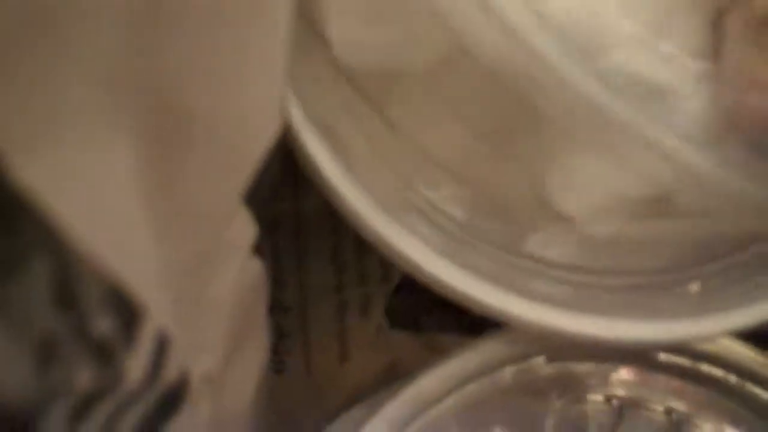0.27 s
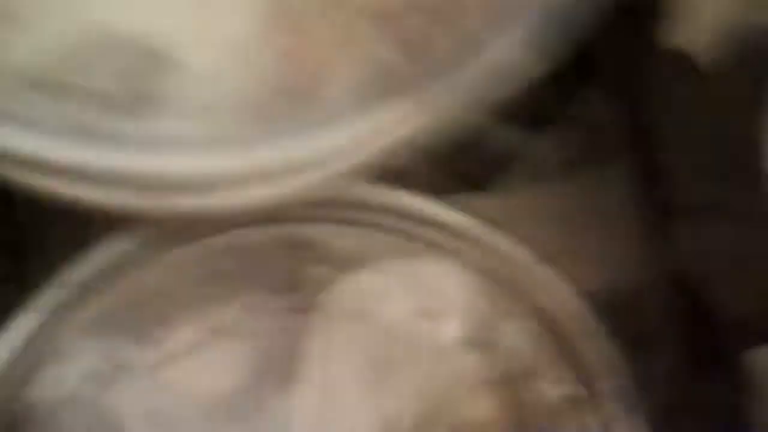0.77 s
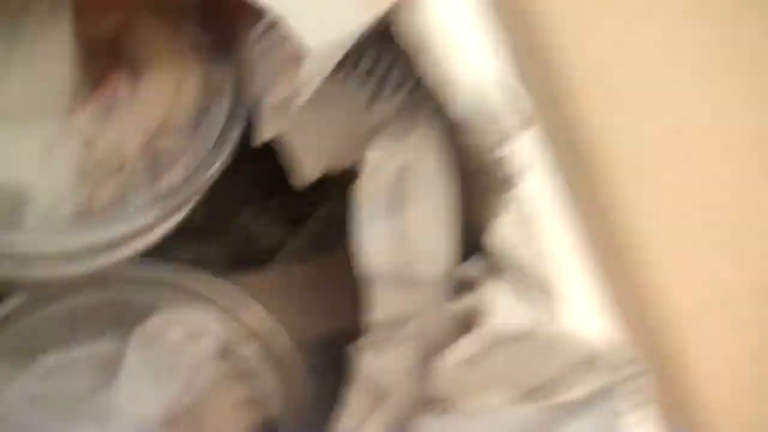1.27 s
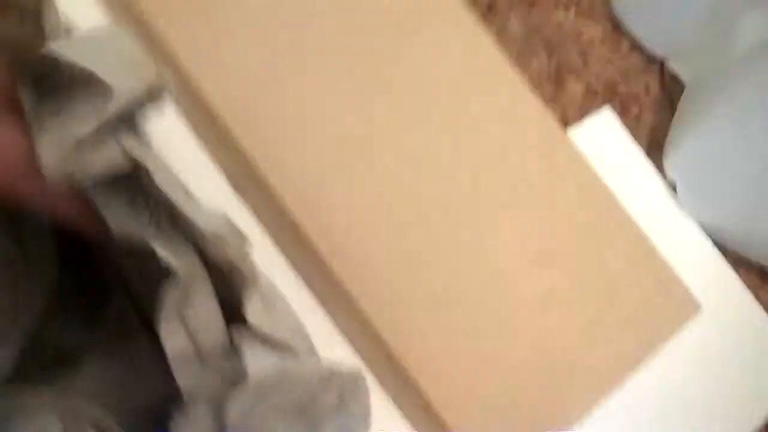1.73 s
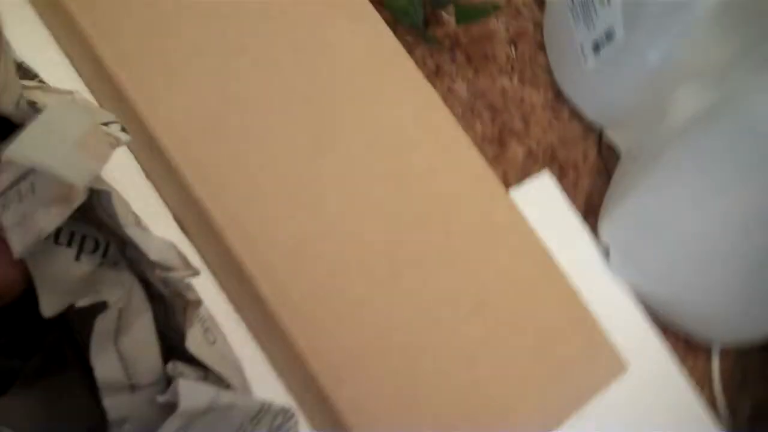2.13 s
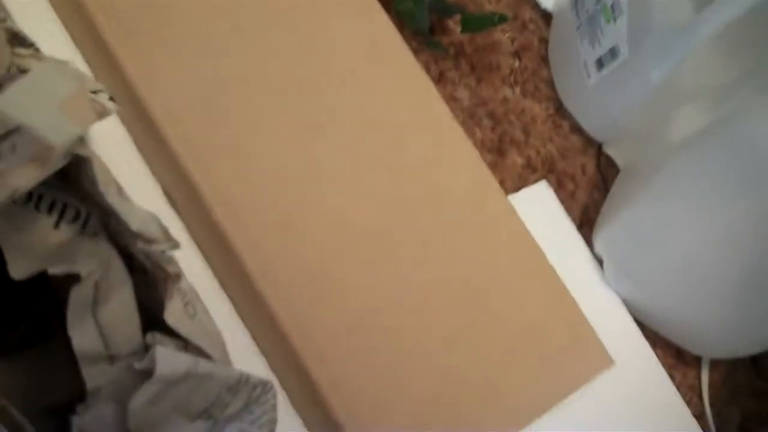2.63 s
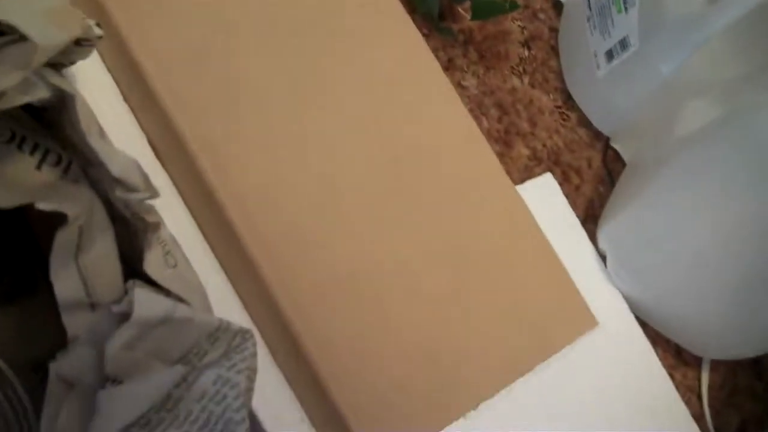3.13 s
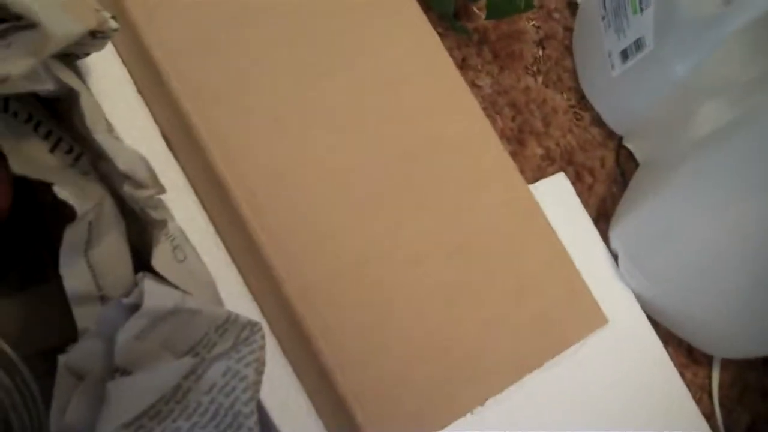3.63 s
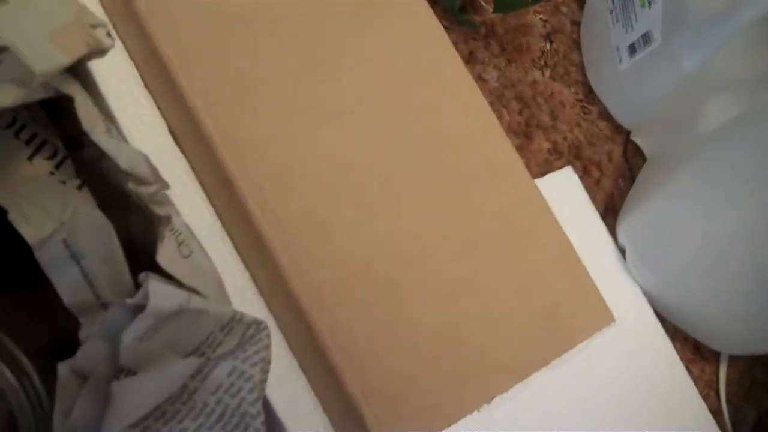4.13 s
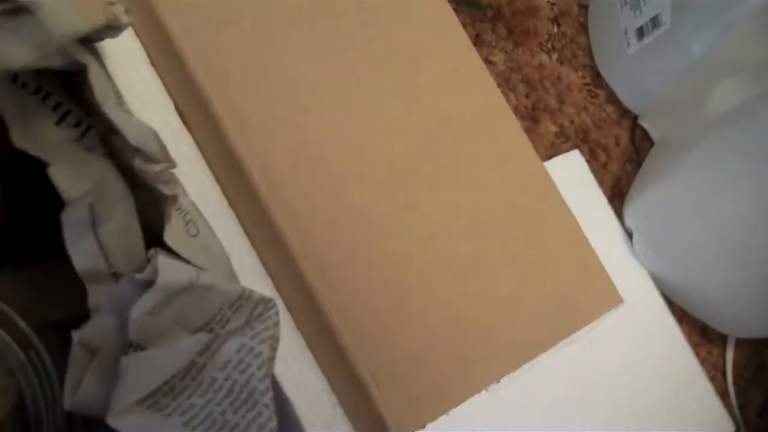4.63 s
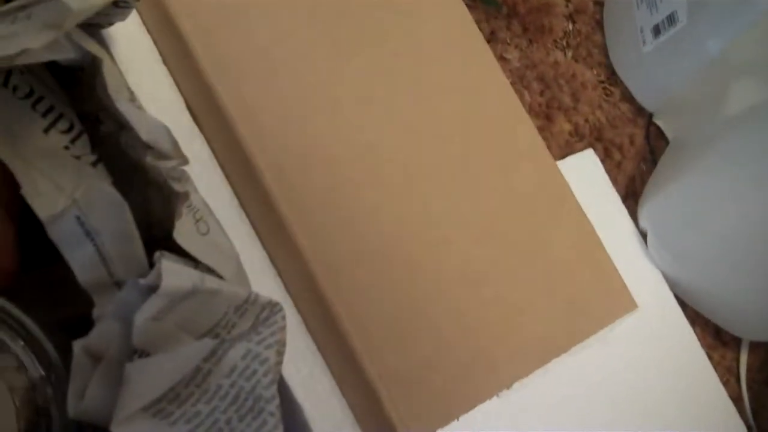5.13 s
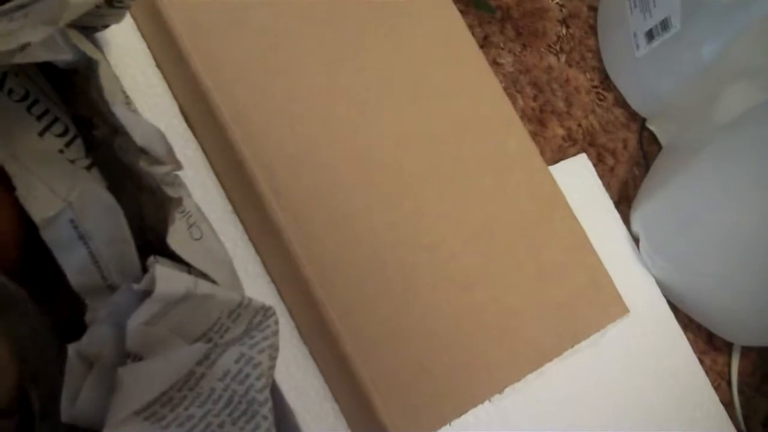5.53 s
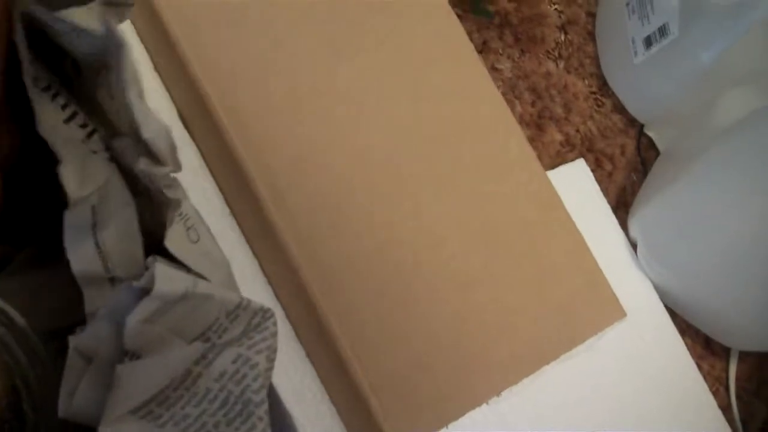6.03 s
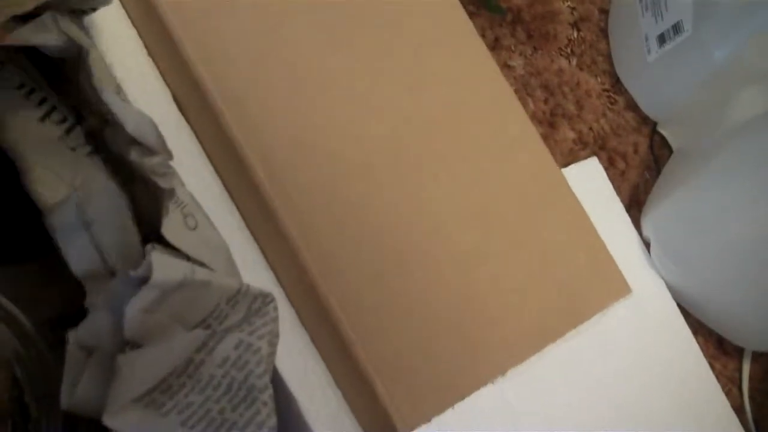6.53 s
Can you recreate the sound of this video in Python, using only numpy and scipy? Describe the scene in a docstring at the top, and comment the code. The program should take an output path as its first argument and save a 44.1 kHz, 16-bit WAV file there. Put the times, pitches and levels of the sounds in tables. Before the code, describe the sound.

Hands push crumpled paper about in a cardboard box. It opens loud, with hissing sheets, hard creasing snaps, a plastic clack, hollow rubbing and low rumble from a dragged tub. The paper softens around three seconds, picks up again with light clicks and a clack, and ends in quick, crunchy strokes. Close stereo microphones, treble-heavy, in a small furnished room.

```python
"""Paper hisses, crinkles and snaps as plastic tubs and crumpled newspaper are pushed about in a cardboard box.
Sliding sheets are filtered noise and tiny crackles; creases snap as short noise bursts, singly or in runs.
Box and tubs give dull bumps, rubs and rumbles from damped noise; clacks and a creak are sums of sines.
Everything is heard close up in a small room, through two microphone ports that ring in the treble;
gain control then pulls the level down after loud sounds, and peaks beyond full scale are clipped."""
import sys
import numpy as np
from scipy import signal
from scipy.fft import rfft, irfft
from scipy.io import wavfile
from scipy.ndimage import uniform_filter1d

SR = 44100
rng = np.random.default_rng(int(sys.argv[2]) if len(sys.argv) > 2 else 0)


def master_out(mix):
    """Clip the mix to full scale and print it as 16-bit PCM to the path in sys.argv[1]."""
    frames = np.transpose(np.atleast_2d(mix))
    ceiling = np.clip(frames, -1, 1)
    pcm = np.round(ceiling * 32767).astype(np.int16)
    wavfile.write(sys.argv[1], SR, pcm)


N = 299659
TIME = np.arange(N) / SR  # seconds

# Spectrum of a cracking crease, for single snaps and runs. Each row: frequency in Hz, level in dB per Hz.
CRACK_SPECTRUM = [(30, -27), (150, -19.5), (500, 1), (1100, -7.5), (1900, 1), (4000, -0.5), (7000, -2),
                  (14000, -0.5)]


def amp(db):
    """Turns decibels into a gain."""
    return 10 ** (np.asarray(db) / 20)


def unit(x):
    """Scales a sound to rms 1."""
    return x / np.sqrt(np.mean(x ** 2) + 1e-20)


def read(points, hz):
    """Reads a table of values between its points, on a log-frequency axis."""
    f, value = np.transpose(points)
    return np.interp(np.log(hz + 1), np.log(f), value)


def add(mix, s, sound):
    """Lays a sound into the mix at s seconds."""
    start = max(round(s * SR), 0)
    part = mix[..., start:][..., :sound.shape[-1]]
    part += sound[..., :part.shape[-1]]


def colour(x, points, size=2048):
    """Filters with the given spectrum, never ahead of time, so that clicks keep their sharp front."""
    hz = abs(np.fft.fftfreq(size, 1 / SR))
    log_gain = np.log(amp(read(points, hz)))
    # minimum phase: the filter answers as early as it can
    response = np.exp(np.conj(signal.hilbert(log_gain)))
    taps = np.fft.ifft(response).real[:size // 2]
    return signal.oaconvolve(x, taps[None], axes=1)[:, :x.shape[1]]


def resonate(x, hz, width_hz):
    """Rings at one pitch; a wider resonance is more damped and dies sooner."""
    pole = np.exp((2j * np.pi * hz - np.pi * abs(width_hz)) / SR)
    return signal.lfilter([1 - abs(pole)], [1, -pole], x).real


def dying(t, t60):
    """Dies away exponentially, by 60 dB in t60 seconds."""
    return np.exp(-np.log(1000) * t / np.maximum(t60, 1e-4))


def wander(rate):
    """Drifts smoothly by chance, about rate times a second, with rms 1."""
    hz = np.fft.rfftfreq(N, 1 / SR)
    slow = rfft(rng.standard_normal(N)) * np.exp(-(hz / rate) ** 2)
    return unit(irfft(slow, N))


def noise(size):
    """White noise, one row for each port."""
    return rng.standard_normal((2, size))


def room_tone():
    """The quiet room's steady background: coloured noise."""
    # Each row: frequency in Hz, level in dB per Hz.
    tone_spectrum = [(25, 19), (130, 5), (300, -7), (1000, -1), (14000, -3)]
    return unit(colour(noise(N), tone_spectrum))


def room(x, size=256):
    """A small furnished room answers with a short noise tail that dies at its own pace in each pitch range."""
    # How long the tail lasts. Each row: frequency in Hz, t60 in seconds.
    tail_times = [(150, 0.16), (3000, 0.3), (14000, 0.22)]
    hz, t, z = signal.stft(noise(SR // 2), SR, nperseg=size)
    fading = z * dying(t, read(tail_times, hz)[:, None])
    tail = signal.istft(fading, SR, nperseg=size)[1]
    tail *= np.minimum(TIME[:tail.shape[1]] / 0.0071, 1)  # builds up over 7.1 ms
    return signal.fftconvolve(x, tail / np.linalg.norm(tail[0]), axes=1)[:, :N]


def stroke(s, length, attack_s=0.014, sag_db=-1.5, release_t60=0.18):
    """One hand movement takes hold in a smooth swell, eases as the paper yields, then lets go."""
    age = TIME - s
    swell = (1 + np.tanh(age / attack_s - 0.5)) / 2
    hold = amp(sag_db * np.clip(age / length, 0, 1))
    return swell * hold * dying(np.clip(age - length, 0, 1), release_t60)


def handling(settle_db=-51.5, rub_db=-24, rub_per_db=0.5):
    """Gains of sliding, squeezing, pressing and dragging; the strongest movement of the moment leads."""
    # The hand pushes the paper. Each row: start in seconds, length in seconds, hiss of the sliding
    # sheets in dB, scrunch of the wad against that hiss in dB (both before the trims in rustle).
    pushes = [(0, 0.093, -31, -3.5), (0.16, 0.077, -29, -1.5), (0.285, 0.083, -34.5, -4),
              (0.391, 0.064, -31, 2), (0.616, .075, -34.5, -5.5), (0.707, 0.085, -33, -1),
              (0.75, 0.19, -30.5, -1), (0.913, 0.081, -27, 0), (0.99, 0.078, -30, -2.5),
              (1.095, 0.21, -36, -5.5), (1.257, 0.31, -33.5, -2), (1.587, 0.22, -38, -2.5),
              (1.724, 0.038, -28.5, 0), (1.795, .19, -35.5, -4.5), (1.994, 0.31, -34, -3),
              (2.324, 0.071, -35, -4), (2.428, 0.095, -37, -0.5), (2.665, 0.06, -38.5, -0.5),
              (2.767, 0.072, -37.5, 0.5), (2.943, 0.21, -42.5, -0.5), (3.219, .05, -37, -5),
              (3.26, 0.19, -28, -7.5), (3.454, 0.1, -31.5, -3), (3.574, 0.12, -43.5, -1.5),
              (3.773, 0.24, -43, -2), (3.904, 0.15, -42, -4), (4.092, 0.056, -33, 2),
              (4.138, 0.23, -37, -2), (4.387, 0.15, -40, -1.5), (4.567, 0.11, -39.5, -2.5),
              (4.661, 0.088, -36.5, -4.5), (4.747, 0.097, -41, -2.5), (4.865, 0.21, -32, -1.5),
              (5.178, 0.032, -36, 0), (5.23, 0.055, -42.5, -2), (5.285, 0.26, -38.5, 1.5),
              (5.38, .08, -35, 0.5), (5.499, 0.089, -31, 0), (5.595, .11, -40, 0), (5.733, 0.16, -40, -1.5),
              (5.913, 0.18, -41.5, -4.5), (5.986, .1, -35, -2.5), (6.11, 0.05, -26, -1.5),
              (6.194, 0.041, -27, -5), (6.268, 0.1, -27, -3), (6.393, .04, -38, -2),
              (6.473, 0.033, -30.5, -4), (6.538, 0.027, -32, -1.5), (6.598, 0.17, -37, -4.5)]
    # A tub is dragged along the box. Each row: start in seconds, length in seconds,
    # level in dB before the trims in rustle and rumble.
    drags = [(0.175, .11, -34), (0.334, 0.22, -36), (.55, .15, -40), (.72, 0.25, -39.5)]
    # the wad keeps settling between pushes
    slide = squeeze = np.full(N, amp(settle_db))
    for s, length, db, scrunch_db in pushes:
        push = amp(db) * stroke(s, length)
        slide = np.maximum(slide, push)
        squeeze = np.maximum(squeeze, amp(scrunch_db) * push)
    drag = np.max([amp(db) * stroke(s, length) for s, length, db in drags], axis=0)
    # a harder squeeze presses on the box more, but by fewer dB than it scrunches
    press = np.maximum(amp(rub_db) * squeeze ** rub_per_db, drag)
    return slide, squeeze, press, drag


def rumble(drag, level_db=-6, judder_db=3):
    """The box floor judders under a dragged tub: low noise of unsteady strength."""
    # Each row: frequency in Hz, level in dB per Hz.
    floor_spectrum = [(25, -11), (70, -15), (130, 5), (200, -9.5), (400, -33), (2000, -60)]
    judder = amp(level_db + judder_db * wander(25))
    return judder * drag * unit(colour(noise(N), floor_spectrum))


def bumps(width_share=0.2, level_db=-7):
    """Soft blows on heavily damped card and plastic panels: short bursts of resonant noise."""
    # Each row: start in seconds, level in dB before level_db, pitch in Hz, t60 of its fading in seconds.
    blows = [(0.2, -17, 154, 0.1), (0.203, -6.5, 950, 0.07), (.382, -16.5, 790, 0.067),
             (0.521, -11.5, 170, 0.041), (0.788, -12, 820, 0.023), (0.788, -26, 75, 0.057),
             (.882, -14, 760, 0.055), (1.147, -15, 990, 0.11), (1.656, -29, 90, 0.034),
             (1.674, -19, 666, 0.05), (3.399, -25, 285, 0.079), (3.922, -17, 377, 0.073),
             (3.923, -30, 80, .06), (4.973, -29, 90, 0.038), (5.576, -20, 360, 0.049),
             (5.688, -21.5, 403, 0.056), (6.145, -19, 357, 0.14), (6.151, -25, 141, 0.088),
             (6.361, -20.5, 315, 0.12), (6.364, -27, 70, 0.061)]
    t, out = np.arange(SR // 6) / SR, np.zeros((2, N))
    for s, db, hz, t60 in blows:
        shape = dying(t, t60) * (1 - np.exp(-t / 0.00018))
        panel = unit(resonate(noise(len(t)), hz, hz * width_share) * shape)
        panel *= np.sqrt(np.mean(shape ** 2))
        add(out, s, amp(db + level_db) * panel)
    return out


def tubs(octave_db=3):
    """A stiff tub's wall rings when knocked, and a tub creaks low and briefly as it slides free."""
    # A tub clacks. Each row: start in seconds, level in dB.
    clacks = [(0.1994, -14), (3.9221, -11.5)]
    # Ringing tones of its wall. Each row: frequency in Hz, level within the clack in dB, t60 in seconds.
    wall_tones = [(747, -11.5, 0.093), (1910, -27, 0.015), (1940, 2, 0.031), (2416, -11, 0.025),
                  (3460, -5.5, 0.011), (3860, -10.5, 0.029)]
    # Course of the creak. Each row: time in seconds, slips per second, level in dB.
    creak = [(0.545, 210, -43), (.572, 230, -40), (.600, 227, -39), (.618, 273, -34), (.630, 350, -64)]
    t, out = np.arange(SR // 10) / SR, np.zeros(N)
    wall = sum(amp(db) * dying(t, t60) * np.sin(2 * np.pi * hz * t) for hz, db, t60 in wall_tones)
    for s, db in clacks:
        add(out, s, amp(db) * wall)

    s, rate, db = np.transpose(creak)
    t = np.arange(s[0], s[-1], 1 / SR)
    turn = 2 * np.pi * np.cumsum(np.interp(t, s, rate)) / SR
    slips = unit(np.sin(turn) + amp(octave_db) * np.sin(2 * turn))
    add(out, s[0], amp(np.interp(t, s, db)) * slips)
    return out


def crinkles(per_s, spread_db, count=64):
    """Countless tiny buckles of unequal size, each briefly ringing one of many paper facets."""
    t, out = np.arange(SR // 120) / SR, np.zeros((2, N))
    for hz in np.geomspace(800, 12000, count):
        at = np.flatnonzero(rng.random(N) < per_s / count / SR)
        crack = noise(len(t)) * dying(t, 0.0066)
        grain = unit(resonate(crack, hz, hz / 4)) + unit(crack)
        sizes = amp(spread_db * np.minimum(rng.exponential(1, N)[at], 3.3))
        for start, size in zip(at, sizes):
            add(out, start / SR, size * grain)
    return unit(out)


def folds(x, depth_db, size=512):
    """Pockets in the wad open and close, so its resonances come and go."""
    z = signal.stft(x, SR, nperseg=size)[2]
    pockets = rng.standard_normal(z.shape[1:])
    pockets = uniform_filter1d(pockets, size=4, axis=0)  # neighbouring pitches
    pockets = uniform_filter1d(pockets, size=5, axis=1)  # neighbouring moments
    gain = amp(depth_db * np.clip(unit(pockets), -2, 2))
    return signal.istft(z * gain, SR, nperseg=size)[1][:, :N]


def rustle(gains, hiss_db=2, scrunch_db=-1, rub_db=-1, smooth_db=-3, scrape_hz=1050, scrape_width_hz=1100,
           scrape_db=-1, tub_grain=0.74, catch_db=2.0, tub_down_s=1.477):
    """Things slide in fits and starts: friction hiss, the scrunch of the wad, and a hollow rub on the box."""
    # Spectra of sliding sheets, squeezed wad and rubbed box.
    # Each row: frequency in Hz, level in dB per Hz.
    hiss_spectrum = [(200, -86), (1200, -27.5), (2500, -0.5), (3500, 7.5), (4500, 4.5), (6500, 0.5),
                     (9000, 0), (14000, 4.5)]
    scrunch_spectrum = [(150, -16), (550, 1.5), (900, -1), (1250, 2), (1800, 8), (2800, 5), (4000, -1),
                        (9000, -15)]
    rub_spectrum = [(25, -31), (80, -13.5), (140, 0), (210, -6), (310, 5), (550, -3.5), (850, -1.5),
                    (1500, -39), (4000, -27)]
    catching = amp(catch_db * wander(50))
    slide, squeeze, press = (gain * catching for gain in gains)
    # the hand drags a tub at first, fading out by tub_down_s; afterwards it works the paper alone
    dragging = np.clip((tub_down_s - TIME) * 10, 0, 1)
    # a smooth tub buckles fewer creases than fingers do, so the grains are softer
    grains = crinkles(per_s=1400, spread_db=2.5) * (1 + (tub_grain - 1) * dragging)
    friction = grains + amp(smooth_db) * noise(N)
    sheets = unit(colour(folds(friction, depth_db=2.1), hiss_spectrum))
    wad = unit(colour(folds(friction, depth_db=3.0), scrunch_spectrum))
    # the tub's hollow body pulls the scrunch down in pitch
    scrape = resonate(noise(N), scrape_hz, scrape_width_hz)
    scrape = unit(resonate(scrape, scrape_hz, 2 * scrape_width_hz))
    wad = wad * (1 - dragging / 2) + amp(scrape_db) * dragging * scrape
    box = unit(colour(noise(N), rub_spectrum))
    return amp(hiss_db) * slide * sheets + amp(scrunch_db) * squeeze * wad + amp(rub_db) * press * box


def crunches(jolt_db=4.0):
    """One crease trips the next: a ragged noise burst that swells fast and runs out."""
    # Runs of creases giving way together. Each row: start in seconds, length in seconds,
    # level in dB before the swell's shape.
    runs = [(0.2, 0.009, -12), (0.428, 0.026, -21), (.499, 0.0084, -9.5), (0.517, 0.011, -7.5),
            (3.387, 0.03, -23.5), (4.673, 0.024, -28), (5.051, 0.0099, -29.5), (6.137, 0.019, -17),
            (6.222, 0.0089, -21), (6.322, 0.013, -18)]
    swell = np.zeros(N)
    for s, length, db in runs:
        age = np.maximum(TIME - s, 0) / length
        swell += amp(db) * np.minimum(age * 7, 1) * np.exp(-np.minimum(age, 10) ** 3 * 0.41)
    jolts = noise(N) * amp(jolt_db * wander(330))
    return swell * unit(colour(jolts, CRACK_SPECTRUM))


def lesser_snaps(slide, count=400, per_s=22, above_db=13.5, spread_db=2, low_hz=1490, high_hz=6600, ring_db=4.5):
    """Lesser creases buckle by chance, louder under a harder push; rows as snaps takes them."""
    gap, size, pitch = rng.random((count, 3)).T
    s = np.cumsum(-np.log(1 - gap)) / per_s
    # level over the gain of the sliding, before the level_db of snaps
    db = 20 * np.log10(np.interp(s, TIME, slide)) + above_db + spread_db * (2 * size - 1)
    hz = low_hz * (high_hz / low_hz) ** pitch
    return np.column_stack([s, db, hz, np.full(count, ring_db)])[s < TIME[-1]]


def snaps(creases, level_db=-8, rise_s=0.00056, ring_cycles=5, crack_t60=0.012,
          shiver_db=-22, shiver_t60=0.055, tick_db=-1, tick_t60=0.004):
    """A crease flips with a bright tick and a crack, its facet rings, and the sheet around it shivers on."""
    t, out = np.arange(SR // 12) / SR, np.zeros((2, N))
    rise = 1 - np.exp(-t / rise_s)
    shape = rise * (dying(t, crack_t60) + amp(shiver_db) * dying(t, shiver_t60))
    shape /= shape.max()
    for s, db, hz, ring_db in creases:
        burst = noise(len(t))
        facet = unit(resonate(burst, hz, hz / ring_cycles))
        tone = unit(colour(burst, CRACK_SPECTRUM)) + amp(ring_db) * facet
        crack = unit(tone * shape) * np.sqrt(np.mean(shape ** 2))
        # the sharpest part of the sound dies first; differences of noise are bright
        tick = amp(tick_db) * np.diff(noise(len(t) + 1)) * rise * dying(t, tick_t60)
        add(out, s, amp(db + level_db) * (crack + tick))
    return out


def close_pair(x):
    """The ports lie close together: they share most of the middle pitches, less of deepest bass and treble."""
    # Each row: frequency in Hz, likeness of the sound at the two ports (1 is the same).
    likeness = [(40, 0.47), (130, 0.98), (500, 1), (2500, 0.73), (6500, 0.3), (14000, 0.47)]
    same = np.clip(read(likeness, np.fft.rfftfreq(N, 1 / SR)), -1, 1)
    left, other = rfft(x)
    right = same * left + np.sqrt(1 - same ** 2) * other
    return irfft(np.array([left, right]), N)


def duck(x, threshold_db=-15, recover_db_per_s=90, share=0.33):
    """Gain control, too slow for a snap's front, pulls down what follows it."""
    power = signal.lfilter(*signal.butter(1, 25, fs=SR), (x ** 2).mean(0))
    # the held level jumps up with the sound and falls back at a steady pace
    recovery = TIME * recover_db_per_s
    held_db = np.maximum.accumulate(10 * np.log10(power + 1e-12) + recovery) - recovery
    return x / amp(share * np.maximum(held_db - threshold_db, 0))


def scene(room_db=-16, tone_db=-61):
    """Paper, box and tubs at arm's length in a quiet room."""
    # Single creases buckling. Each row: start in seconds, level in dB before the level_db of snaps,
    # pitch of the facet in Hz, its ring against the crack in dB.
    creases = [(0.031, -11, 3500, -26), (0.049, -13.5, 5300, -9), (0.085, -14, 7900, 1),
               (0.202, 0.5, 7500, -17), (0.22, -8, 1290, 1), (0.233, -12, 2300, 1), (0.25, -5, 7100, -4),
               (0.257, -4, 7300, -8), (0.44, 3, 5670, -31), (0.465, -1.5, 6400, -5), (0.495, -9, 7500, 8),
               (0.499, -10, 6300, 0), (0.829, -16, 6700, 8), (0.835, -3.5, 2800, 31),
               (0.883, -5, 6850, -15), (1.002, -10, 5000, 8), (1.049, -17, 6500, 2), (1.12, -14, 4650, 5),
               (1.146, -5.5, 4920, 21), (1.248, -14.5, 2770, 26), (1.309, -11, 4600, 5),
               (1.408, -13.5, 1790, -4), (1.485, -7.5, 1270, 1.5), (1.658, -2.5, 3390, -22),
               (1.675, -12, 1730, 4), (1.689, -11.5, 3540, 4), (1.743, 1.5, 3730, -1),
               (1.767, -13, 4000, 5), (1.8, -15.5, 5060, -10), (1.809, -10.5, 4870, -7),
               (1.868, -15.5, 1820, 16), (2.061, -11, 4240, -8), (2.074, -11.5, 4740, 0),
               (2.111, -14.5, 3560, -11), (2.191, -14.5, 1970, -2), (2.255, -15, 4670, -13),
               (2.316, -10.5, 1770, 0), (2.508, -17.5, 1760, 3), (2.538, -8.5, 1440, -4),
               (2.687, -17.5, 2140, 0), (2.717, -14, 5510, -8), (2.729, -11, 3530, -7),
               (3.236, -14, 4150, -15), (3.283, -7.5, 3600, -27), (3.35, -2, 5040, -29),
               (3.424, -5, 5150, -21), (3.469, -10, 3860, -9), (3.921, 2, 2200, 16),
               (3.931, -7.5, 1810, -11), (4.003, -15.5, 2100, 14), (4.016, -9, 3750, 10),
               (4.303, -18, 2300, -5), (4.33, -12.5, 4400, 1), (4.357, -12, 6800, -29),
               (4.41, -18, 2300, 4), (4.605, -11, 4300, -8), (4.633, -16, 1820, -10),
               (4.676, -12, 7150, -14), (4.722, -11, 1810, 1), (4.833, -17, 1500, -2),
               (4.949, -8.5, 5800, -2), (4.971, -0.5, 2020, -33), (5.044, -10, 2410, -11),
               (5.092, -15, 2370, 0), (5.323, -18.5, 1990, -4), (5.425, -12.5, 1960, 7),
               (5.511, -18, 1700, 8), (5.558, -10.5, 2750, -8), (5.577, -9.5, 5400, -1),
               (5.896, -20, 1950, 21), (5.959, -19, 2280, 23), (6.012, -5.5, 3400, 9), (6.05, -9, 2300, -5),
               (6.27, -6.5, 2000, -14), (6.349, -5.5, 3120, -8), (6.362, -4, 1430, -7),
               (6.654, -14, 3200, 7)]
    slide, squeeze, press, drag = handling()
    paper = rustle((slide, squeeze, press)) + snaps(creases) + crunches()
    ticks = snaps(lesser_snaps(slide), crack_t60=0.0073, rise_s=0.00022, shiver_db=-30)
    near = close_pair(paper + ticks + bumps() + rumble(drag)) + tubs()
    return near + amp(room_db) * room(near) + amp(tone_db) * room_tone()


def record(dry):
    """Port resonances, gain control, overload at full scale, then the band limit."""
    # Each microphone port has its own resonance. Each row: frequency in Hz, gain in dB.
    left_port = [(130, -1.5), (400, -0.1), (2300, 3.5), (4500, 3.5), (6600, 8.5), (7400, 15.5), (8100, 16),
                 (9000, 7), (10500, 0.5), (14000, -8.5)]
    right_port = [(100, -2.5), (2300, 1.5), (4500, 4), (6400, 11), (7400, 5), (8200, -1.5), (9700, -9.5),
                  (14000, -32.5)]
    ports = np.vstack([colour(dry[:1], left_port), colour(dry[1:], right_port)])
    overloaded = np.clip(duck(ports), -1, 1)
    low_pass = signal.firwin(301, 14450, window=("kaiser", 8), fs=SR)  # edge in Hz
    return signal.oaconvolve(overloaded, low_pass[None], "same", axes=1)


dry = scene()
out = record(dry)
master_out(out)
```